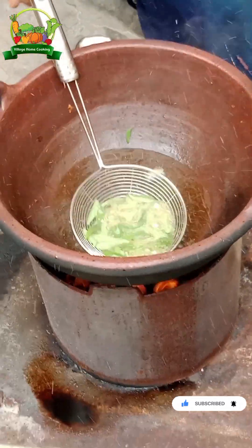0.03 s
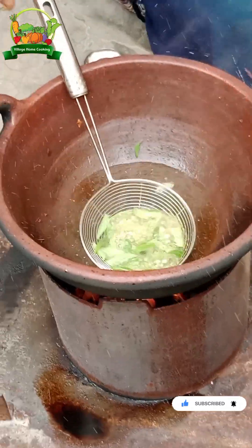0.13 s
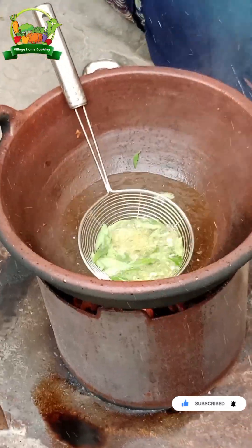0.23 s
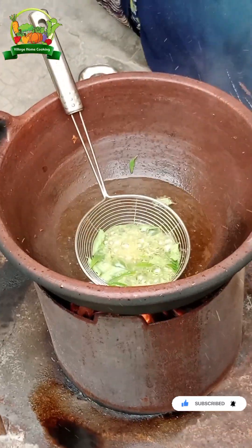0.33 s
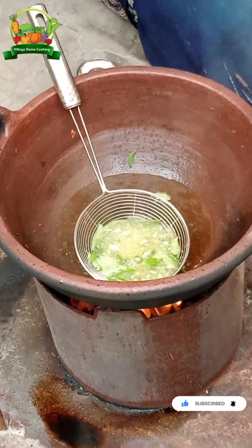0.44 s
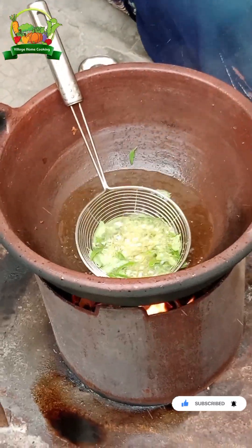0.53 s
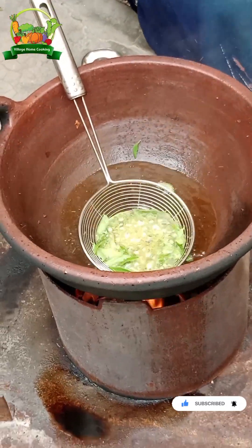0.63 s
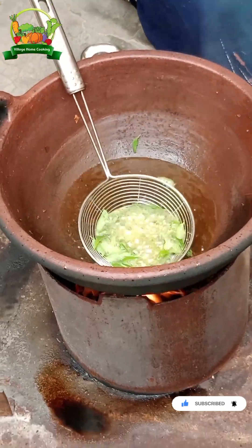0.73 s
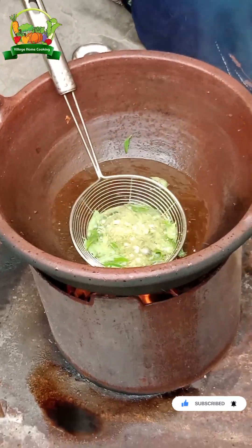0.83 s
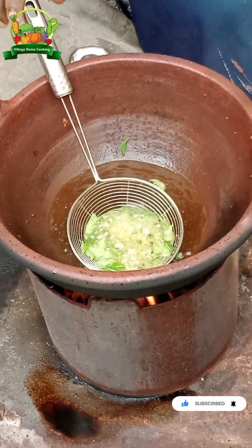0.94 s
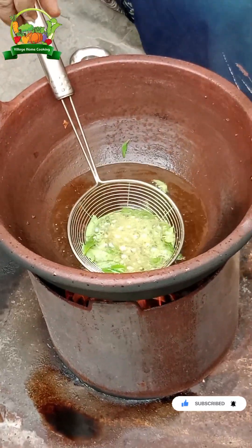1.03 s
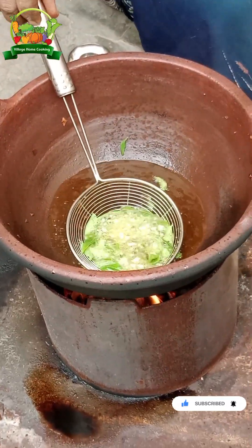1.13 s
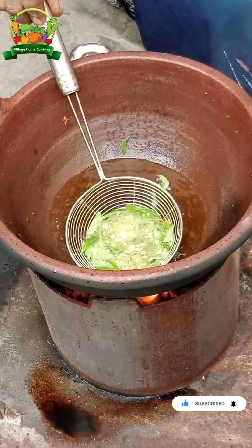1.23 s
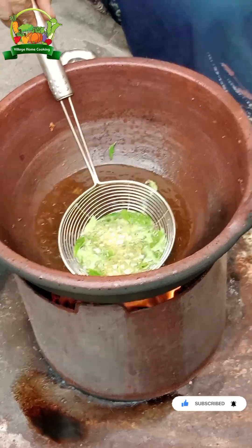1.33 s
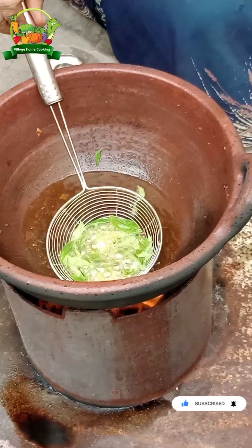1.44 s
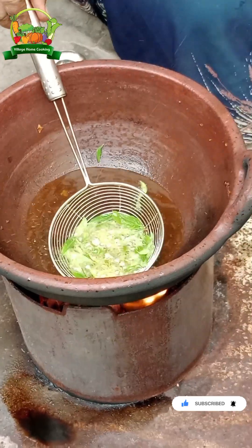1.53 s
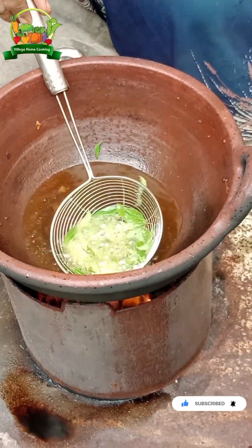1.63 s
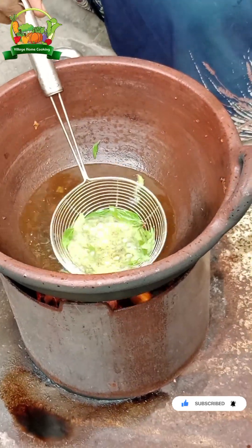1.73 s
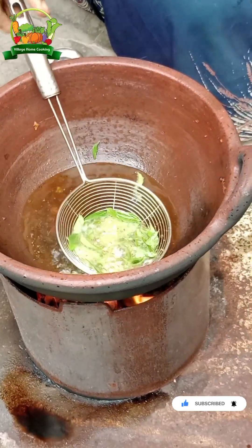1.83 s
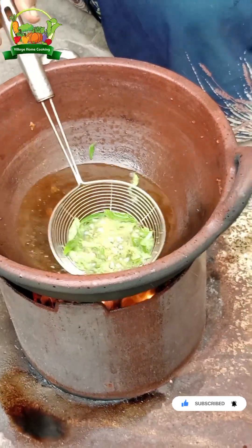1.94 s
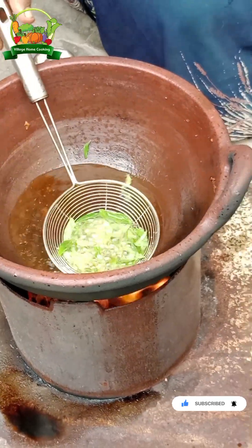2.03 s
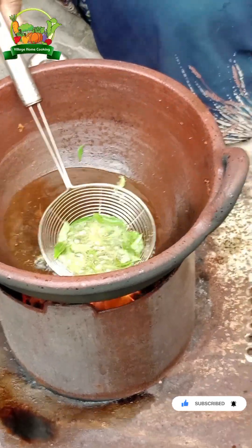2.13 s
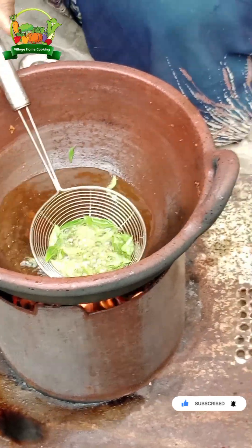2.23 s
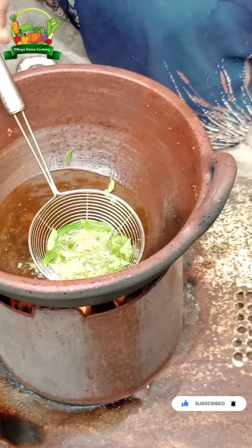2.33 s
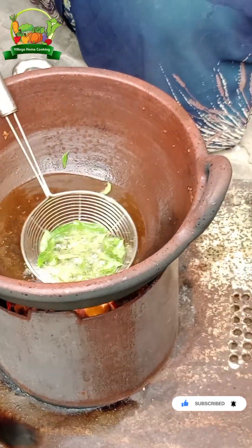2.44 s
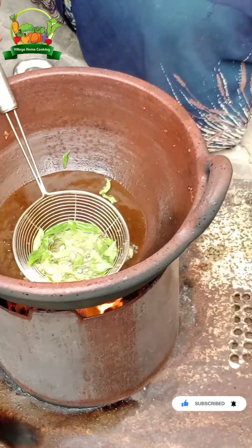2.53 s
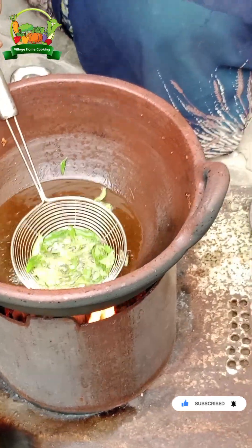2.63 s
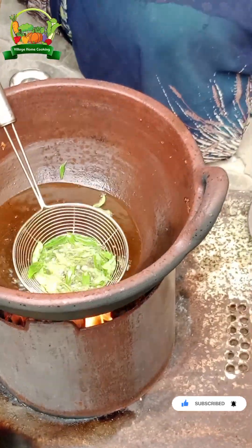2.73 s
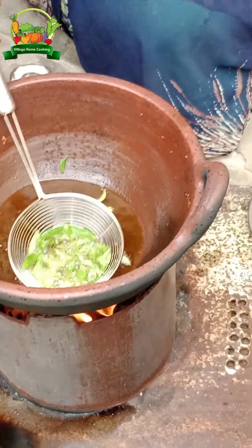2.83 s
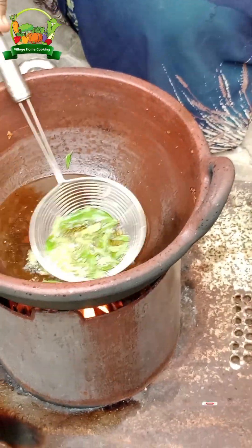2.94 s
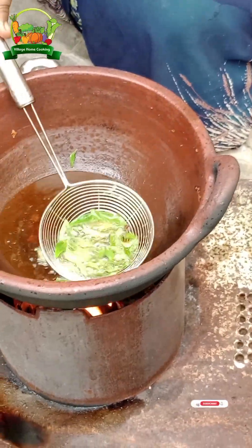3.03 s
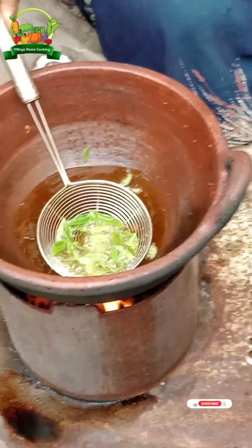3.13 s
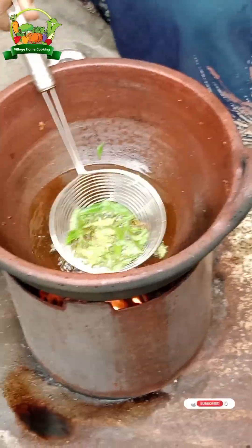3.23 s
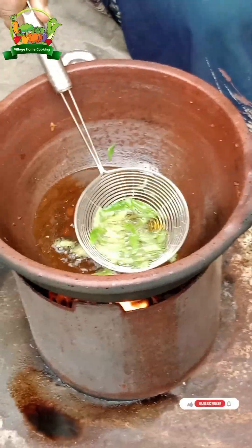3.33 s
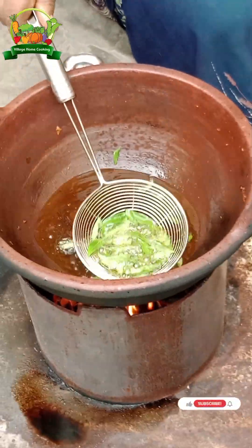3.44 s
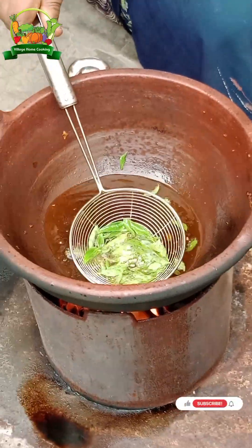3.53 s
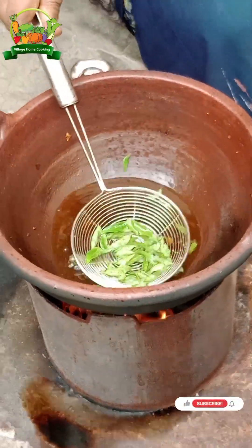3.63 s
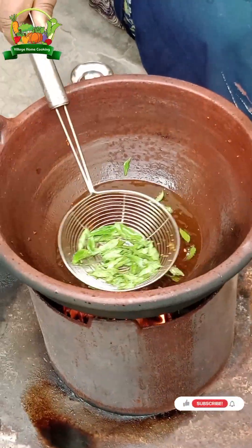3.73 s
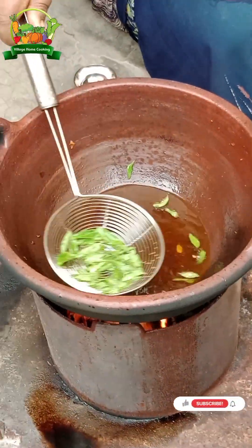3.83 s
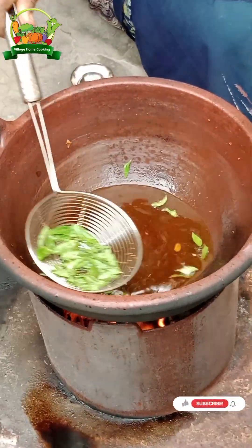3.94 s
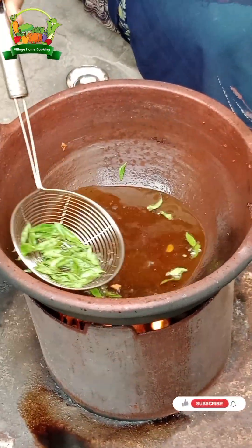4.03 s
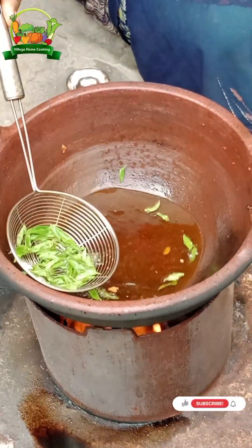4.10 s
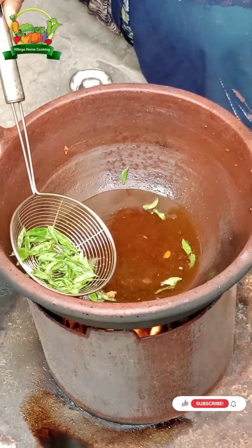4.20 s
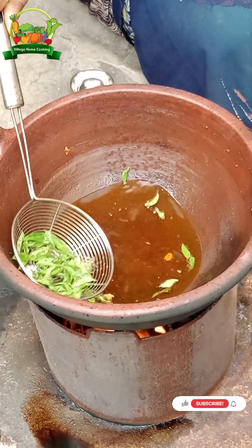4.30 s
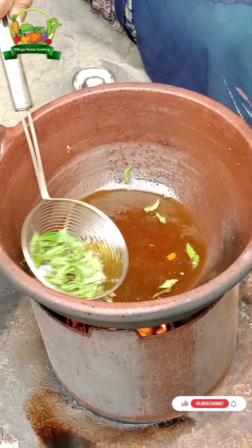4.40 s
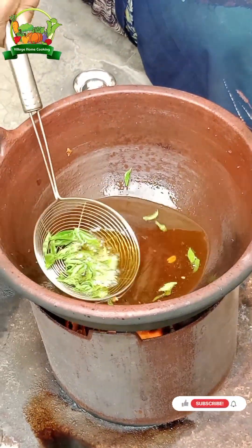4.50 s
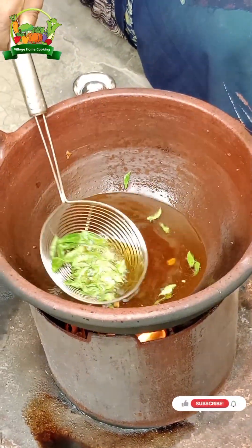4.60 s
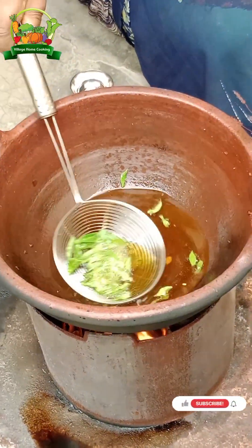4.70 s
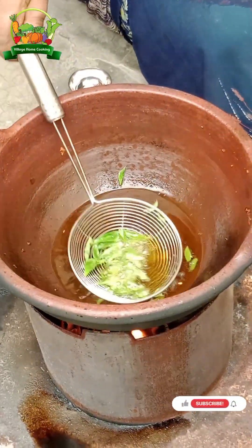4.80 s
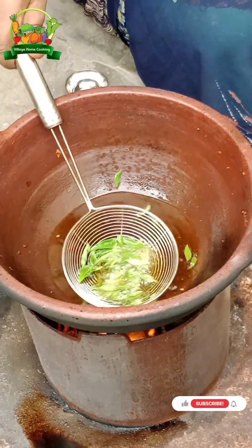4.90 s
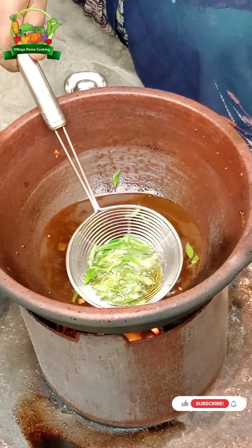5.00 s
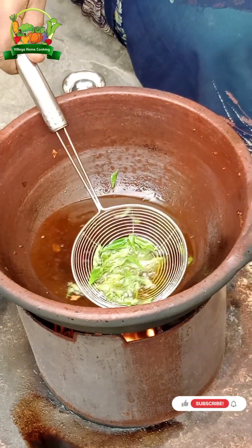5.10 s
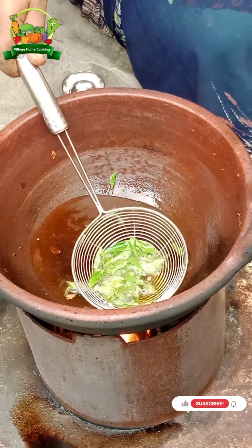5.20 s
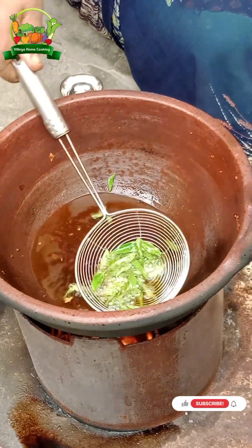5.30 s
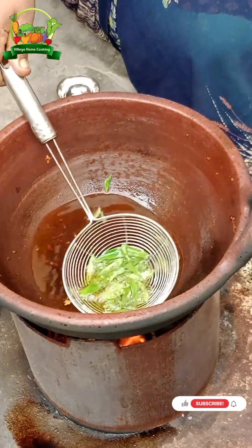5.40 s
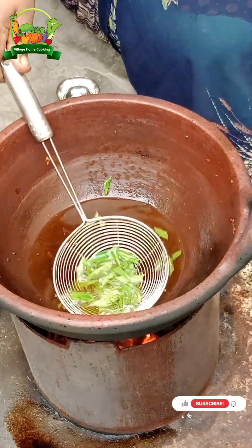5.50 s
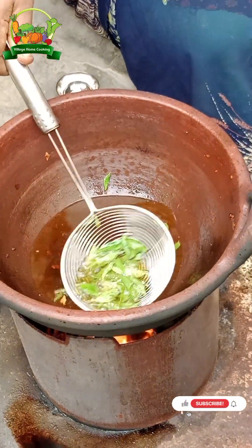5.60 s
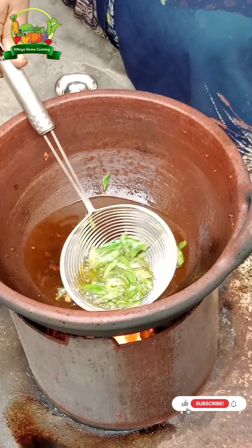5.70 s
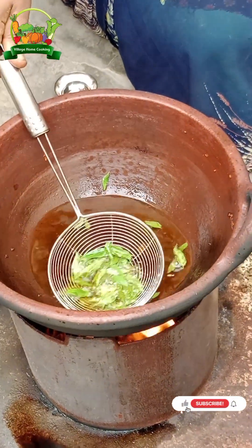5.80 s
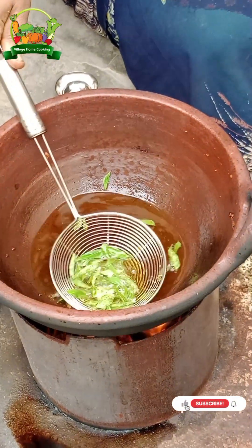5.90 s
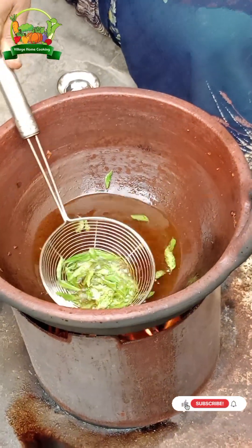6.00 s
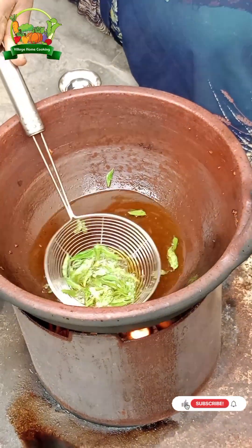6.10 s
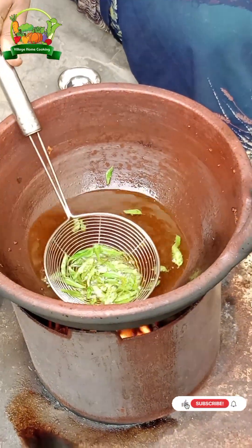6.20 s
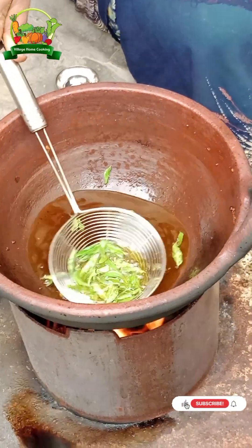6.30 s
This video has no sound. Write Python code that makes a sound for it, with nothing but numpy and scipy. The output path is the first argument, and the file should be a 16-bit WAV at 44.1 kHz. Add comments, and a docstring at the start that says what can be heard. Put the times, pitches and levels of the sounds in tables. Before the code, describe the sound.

Wet leaves fry in a wire skimmer in a clay pot of hot oil, crackling densely with sharp pops. After about two seconds the crackle thins to lone pops, a soft fizz and small bubbles. The skimmer rubs the clay with short squeaks and light scrapes, then knocks the pot once near the end. Heard from just above the pot, outdoors, over a faint fire rumble.

```python
"""A dense crackle opens the scene: wet leaves fry in a wire skimmer in a clay pot of hot oil, outdoors.
Water flashes to steam and bursts out in sharp pops and ticks that echo round the resonant bowl.
As the leaves dry, the crackle thins to lone pops and to ringing bubbles that fizz, plink and gulp.
Friction makes the skimmer sing and scrape on the clay, and one knock rings the modes of the pot.
Underneath, a wood fire rumbles."""
import sys
import numpy as np
from scipy import signal
from scipy.fft import rfft, irfft
from scipy.io import wavfile

SR = 44100
rng = np.random.default_rng(int(sys.argv[2]) if len(sys.argv) > 2 else 0)


def materialize(psi):
    """Save the field psi as 16-bit PCM at rate SR to the path in sys.argv[1].

    A 1-D psi becomes a single channel; in a 2-D psi each row is a channel.
    """
    bounded = np.clip(np.atleast_2d(psi).T, -1, 1)
    quanta = np.round(bounded * 32767).astype(np.int16)
    wavfile.write(sys.argv[1], SR, quanta)


N = 280035
TIME = np.arange(N) / SR
RING = 16384  # samples given to one event and its echoes

# Spectrum of oil spray. Each row: frequency in Hz, relative level in dB.
SPRAY_SPECTRUM = [(500, -21.5), (1500, 5), (3400, 9.5), (4800, 4), (6600, 4), (7800, -9.5), (10000, -25),
                  (12000, -50.5), (15000, -45.5)]


def undb(db):
    """Amplitude ratio of a level in decibels."""
    return 10 ** (np.asarray(db) / 20)


def unit(x):
    """Normalisation to rms 1."""
    return x / np.sqrt(np.mean(x ** 2) + 1e-20)


def fade(t, t60):
    """Exponential decay, 60 dB down after t60 seconds."""
    return np.exp(-np.log(1000) * t / t60)


def add(out, s, sound):
    """Superposition: a sound joins the mix at s seconds."""
    i = max(int(s * SR), 0)
    out[i:i + len(sound)] += sound[:max(N - i, 0)]


def freqs(size):
    """Frequencies of a real Fourier transform, kept above zero."""
    return np.maximum(np.arange(size // 2 + 1) * SR / size, 1)


def shape(points, size):
    """Spectral envelope in dB, interpolated over log frequency."""
    hz, db = np.transpose(points)
    return np.interp(np.log(freqs(size)), np.log(hz), db)


def band(size, hz, width_hz):
    """Response of a damped resonator, gain 1 at its centre."""
    f = freqs(size)
    return 1 / (1 + 1j * (f - hz ** 2 / f) / width_hz)


def filtered(x, response):
    """Linear filtering: the spectrum times a frequency response."""
    return irfft(rfft(x) * response, len(x))


def noise(size, response):
    """Gaussian noise coloured by a frequency response, at rms 1."""
    return unit(filtered(rng.standard_normal(size), response))


def through(source, response):
    """Convolution with an impulse response, cut to RING samples."""
    return signal.fftconvolve(source, response)[:RING]


def pulse(db):
    """Minimum phase: the most sudden pulse that has this spectrum."""
    cepstrum = irfft(np.log(undb(db)))
    cepstrum[1:RING // 2] *= 2
    cepstrum[RING // 2 + 1:] = 0
    return irfft(np.exp(rfft(cepstrum)))


def clicks(per_s, spread_db):
    """A Poisson train of uneven impulses, whose mean power stays even as the rate moves."""
    size = undb(spread_db * np.minimum(rng.standard_normal(N), 2))
    return (rng.random(N) < per_s / SR) * size / np.sqrt(per_s)


def bowl(early_db=-8, late_db=-7.5, early_t60=0.073, late_t60=0.16):
    """Impulse response from one spot in the oil: a dulled direct sound, reflection, then cavity resonance."""
    # Short echoes from the pot, then fainter ones from the ground or a nearby wall.
    # Each row: mean delay in milliseconds, mean gain.
    echoes = [(1.5, -0.036), (6.9, 0.23), (9.7, -0.16), (16.5, 0.055), (30, -0.011), (33.3, 0.021)]
    # Air resonances of the bowl. Each row: frequency in Hz, bandwidth in Hz, relative level in dB.
    air_modes = [(485, 94, 11.5), (677.5, 130, 11), (860, 62, 9.5), (1307, 42, 2), (1286.6, 38, 16.5),
                 (1401, 27, 8.5), (1776, 440, 8.5), (1976, 9.6, -6), (2680, 32, 0), (2945, 550, -17),
                 (3060, 20, -6.5), (3350, 22, -6.5)]
    t, f = np.arange(RING) / SR, freqs(RING)
    shadow_gain, shadow_hz = undb(-7), 2600  # the direct sound arrives with its treble dulled
    bent = np.exp(-2 * np.pi * shadow_hz * t)
    path = (1 - shadow_gain) * bent / bent.sum()
    path[0] += shadow_gain
    for ms, gain in echoes:
        delay_s = ms / 1000 * (1 + 0.027 * rng.uniform(-1, 1))
        path[int(delay_s * SR)] += gain * (1 + 0.055 * rng.standard_normal())
    focus_s, focus_width_s = 0.0078, 0.00029  # the curved wall focuses treble into one echo
    glint = unit(rng.standard_normal(RING) * np.exp(-((t - focus_s) / focus_width_s) ** 2))
    path += undb(-7) * filtered(glint, 1 / (1 + (5000 / f) ** 4)) / np.sqrt(RING)
    tail, build_s = 0, 0.0012
    for db, t60 in ((early_db, early_t60), (late_db, late_t60)):
        scatter = rng.standard_normal(RING) * fade(t, t60) * (1 - np.exp(-t / build_s))
        tail += undb(db) * unit(scatter) / np.sqrt(RING)
    cavity = 0.31 + sum(undb(db) * band(RING, hz, width) for hz, width, db in air_modes) / 2
    treble_lift = undb(4 * f ** 2 / (f ** 2 + 3000 ** 2))
    return path + filtered(tail, cavity * treble_lift)


def surges(rows, attack_s, release_t60, sag_db_per_s):
    """Incoherent sources add in power: the envelope of surges that each swell, sag and die away."""
    power = 0
    for s, length, db in rows:
        t = np.maximum(TIME - s, 0)
        held = undb(db - sag_db_per_s * np.minimum(t, length)) * (1 - np.exp(-t / attack_s))
        power += (held * fade(np.maximum(t - length, 0), release_t60)) ** 2
    return np.sqrt(power)


def boiling():
    """Amplitude envelope of flash boiling: each bout starts suddenly and ends quickly."""
    # Bouts of boiling. Each row: start in seconds, length in seconds, relative level in dB.
    bouts = [(0.0, 0.11, -29.5), (0.14, 0.056, -36), (0.187, 0.21, -33), (0.43, 0.23, -34.5),
             (0.682, 0.078, -42.5), (0.885, 0.096, -52), (1.02, 0.086, -44), (1.137, 0.018, -45),
             (1.295, 0.037, -49.5), (1.46, 0.2, -40.5), (1.73, 0.22, -41), (2.0, 0.057, -55)]
    return surges(bouts, attack_s=0.00048, release_t60=0.078, sag_db_per_s=21.5)


def burst(hz):
    """A steam bubble tears open as a heavily damped oscillator: about one cycle, more if small."""
    # Colour that the pot gives every burst. Each row: frequency in Hz, relative level in dB.
    colour = [(100, -22.5), (290, -10.5), (400, -15), (520, 10.5), (800, 7), (1050, 3), (1550, 1.5),
              (2100, -3), (3600, 3), (4600, -2), (6500, -4), (7800, -17), (10000, -19.5), (13000, -36)]
    resonance = np.abs(band(RING, hz, hz / (hz / 1000) ** 0.34))
    low_cut = np.sqrt(1 + (0.3 * hz / freqs(RING)) ** 4)
    crack = pulse(shape(colour, RING) + 20 * np.log10(resonance / low_cut + 0.0006))
    return crack / np.sqrt(np.mean(crack[:RING // 128] ** 2))  # rms 1 over the first 3 ms


def spray(swell_s=0.00077, grain_db=5, ripple_db=4, ripple_hz=1200):
    """Atomisation: droplets tear off a burst as grainy noise, each spray with its own colour."""
    t = np.arange(RING) / SR
    drops = rng.standard_normal(RING) * undb(grain_db * np.repeat(rng.standard_normal(RING // 32), 32))
    ripple = np.interp(freqs(RING), np.arange(32) * ripple_hz, rng.standard_normal(32))
    colour = shape(SPRAY_SPECTRUM, RING) + ripple_db * ripple
    hiss = through(drops * np.sqrt(t) * np.exp(-t / swell_s), pulse(colour))
    return hiss / np.sqrt(np.mean(hiss[:RING // 32] ** 2))


def crackle(gain_db=-2, wet_per_s=950, dry_per_s=170, drying_s=0.18, centre_hz=1150, sizes=10):
    """Shot noise from crowds of small steam bursts, whose rate falls as water leaves the leaves."""
    out, strength = 0, boiling()
    per_s = dry_per_s + (wet_per_s - dry_per_s) * np.exp(-TIME / drying_s)
    for octaves in np.linspace(-0.92, 0.92, sizes):
        source = burst(centre_hz * 2 ** octaves) + undb(-30) * spray()
        heard = through(source, bowl())
        onsets = unit(clicks(per_s / sizes, spread_db=4.5)) * strength
        out += signal.fftconvolve(onsets, heard / np.linalg.norm(heard))[:N]
    return out * undb(gain_db) / np.sqrt(sizes)


def foaming():
    """Amplitude envelope of the foam, which wells up gently round the leaves and ebbs away."""
    # Surges of foam. Each row: start in seconds, length in seconds, relative level in dB.
    wellings = [(0.0, .77, -63), (.87, 0.57, -68), (1.29, 0.6, -58.5), (1.73, 0.23, -60.5),
                (2.0, 0.059, -58.5), (2.15, 0.14, -58), (2.64, 0.15, -64), (2.87, 0.11, -69),
                (3.05, 0.24, -73.5), (3.24, 0.38, -64), (3.7, 0.042, -68.5), (4.695, 0.073, -65),
                (5.305, 0.053, -73.5), (5.42, 0.04, -77)]
    return surges(wellings, attack_s=0.02, release_t60=0.5, sag_db_per_s=2)


def spatter(boil_db=-19, foam_db=-8, per_s=110, spots=6):
    """Shot noise from tiny droplets that crack on the hot oil whenever it boils or foams."""
    out, strength = 0, boiling() * undb(boil_db) + foaming() * undb(foam_db)
    tick = pulse(shape(SPRAY_SPECTRUM, RING))
    for _ in range(spots):
        heard = through(tick, bowl(early_db=-8.5, late_db=-23.5))
        onsets = unit(clicks(per_s / spots, spread_db=5)) * strength
        out += signal.oaconvolve(onsets, heard / np.linalg.norm(heard))[:N]
    return out / np.sqrt(spots)


def bubble(hz, life_s, glide):
    """Bubble resonance: trapped gas rings as a spring, its pitch rising as it nears the surface."""
    age = np.arange(RING // 8) / SR / life_s
    pitch_hz = hz * (1 + glide * np.tanh(age - 0.5))
    return age ** 2 * np.exp(-4 * age) * np.sin(2 * np.pi * np.cumsum(pitch_hz) / SR)


def fizz(gain_db=-0.5, fresh_per_s=260, old_per_s=18, thinning_s=1.3, sizes=18):
    """Foam bubbles resonate at pitches set by their size; the dense hiss thins as the foam ages."""
    # Colour of the foam. Each row: frequency in Hz, relative level in dB.
    colour = [(300, 2), (700, 13.5), (1300, 12), (2200, 6), (4000, 13), (6400, 7.5), (7800, -21),
              (11000, -30), (15000, -31.5)]
    out = 0
    per_s = old_per_s + (fresh_per_s - old_per_s) * np.exp(-TIME / thinning_s)  # in each size
    for hz in np.linspace(1200, 7200, sizes):
        chirp = through(bubble(hz, life_s=0.001, glide=0.16), bowl(early_db=-6.5, late_db=-0.5))
        out += signal.fftconvolve(clicks(per_s, spread_db=3), chirp)[:N]
    return unit(filtered(out, undb(shape(colour, N)))) * foaming() * undb(gain_db)


def fire(rise_from_s=1, rise_s=0.96, growth_db_per_s=0.45, dip_s=0.066):
    """Modulated noise: under fluttering flames a low rumble, faint, then louder, with brief dips."""
    # Spectra of rumble, flames and open air. Each row: frequency in Hz, relative level in dB.
    rumble_spectrum = [(20, -27), (38, -5), (52, 5.5), (80, 8.5), (110, 4), (170, -16), (300, -36.5),
                       (600, -75.5)]
    flame_spectrum = [(30, -41), (70, -23.5), (100, -0.5), (135, 6.5), (180, -8.5), (300, -9), (600, -13),
                      (1500, -29.5), (5000, -45.5), (8000, -70.5)]
    air_spectrum = [(100, 9), (500, 7.5), (1500, -1), (3000, -7), (6300, -9.5), (8000, -17.5),
                    (15000, -28.5)]
    # Brief dips in the rumble. Each row: centre in seconds, depth in dB.
    dips = [(2.08, 30), (2.291, 29), (2.82, 15), (3.72, 21), (3.941, 17), (4.708, 29), (5.42, 15.5)]
    spectra = rumble_spectrum, flame_spectrum, air_spectrum
    rumble, flame, air = (noise(N, undb(shape(points, N))) for points in spectra)
    flutter = noise(N, band(N, 5.16, 2.3) ** 2)
    waver = noise(N, band(N, 1.6, 7.3) ** 2)
    risen = np.clip((TIME - rise_from_s) / rise_s, 0, 1)
    dip_db = sum(db * np.exp(-((TIME - s) / dip_s) ** 2) for s, db in dips)
    rumble_db = -84 + 24 * risen + growth_db_per_s * (TIME - TIME.mean()) + 3.5 * waver - dip_db
    flame_db = -77 + 5 * risen - 3 * flutter
    return rumble * undb(rumble_db) + flame * undb(flame_db) + air * undb(-81)


def plops(t60=0.055, swell_s=0.0019, glide=0.062, glide_s=0.0098):
    """Large bubbles resonate low: each gulps through the skimmer, rising a little in pitch."""
    # Large bubbles. Each row: start in seconds, peak level in dB, nominal pitch in Hz.
    gulps = [(.012, -43, 399), (0.109, -53.5, 390), (0.256, -47, 419), (1.897, -34, 506),
             (1.905, -47.5, 374), (1.916, -33, 495), (1.935, -37, 524), (2.301, -44.5, 557),
             (2.318, -44.5, 580), (2.337, -52.5, 524), (2.425, -45.5, 390), (2.432, -38.5, 572),
             (2.457, -43, 523), (2.503, -41, 541), (2.543, -50.5, 507), (2.57, -47, 535), (2.605, -53, 515),
             (5.039, -49.5, 524), (5.054, -45.5, 533), (5.063, -46, 405), (5.08, -49.5, 432),
             (5.093, -45.5, 610), (5.099, -60, 456), (5.11, -52, 628), (5.134, -51, 524), (5.172, -53, 640),
             (5.177, -50, 508), (5.209, -54, 500), (5.464, -38, 601), (5.497, -48, 398),
             (6.328, -48.5, 555)]
    out, t = np.zeros(N), np.arange(RING // 4) / SR
    envelope = fade(t, t60) * (1 - np.exp(-t / swell_s)) ** 2
    bend = 1 + glide * np.tanh(t / glide_s - 0.5)
    for s, db, hz in gulps:
        gulp = envelope * np.sin(2 * np.pi * np.cumsum(hz * bend) / SR)
        heard = through(gulp, bowl(early_db=-10.5, late_db=-3.5))
        add(out, s, undb(db) * heard / np.abs(heard).max())
    return out


def froth(low_hz=1500, high_hz=6400, swell_s=0.011, life_s=0.0032, count=14):
    """A handful of tiny bubbles resonate at random times, building up and trailing away."""
    out = np.zeros(RING)
    starts = rng.gamma(2, swell_s, count)
    pitches = low_hz * (high_hz / low_hz) ** rng.random(count)
    for s, hz, db in zip(starts, pitches, 5 * rng.standard_normal(count)):
        tone = bubble(hz, life_s, glide=0.05)
        i = min(int(s * SR), RING // 2)
        out[i:i + len(tone)] += undb(db) * tone
    return out / np.sqrt(np.sum(out ** 2) / (RING // 16))  # the energy of 23 ms at rms 1


def pops(gain_db=-1.5, spurt_s=0.009, froth_lead_s=0.009):
    """Sudden pressure release: loud steam bursts, each with froth, spray and a second spurt."""
    # Loud bursts. Each row: start in seconds, relative level in dB, bubble pitch in Hz.
    bursts = [(.0362, -29, 1300), (.048, -36.5, 1150), (0.0569, -25, 1630), (0.0662, -29.5, 2100),
              (0.0832, -28, 1940), (.0977, -29.5, 1300), (.1083, -32, 1130), (.1153, -29.5, 1400),
              (.1346, -21.5, 1600), (.1827, -29.5, 1520), (0.2112, -34, 1490), (.2295, -28.5, 1090),
              (.2485, -35.5, 1600), (.268, -26.5, 1340), (.2862, -35, 1030), (.2995, -31, 1250),
              (0.3236, -24, 1200), (.3526, -32, 1420), (0.3594, -34, 1140), (0.4167, -37, 1310),
              (.4472, -27.5, 1120), (0.4553, -32, 1880), (.4936, -49, 1190), (.5197, -38, 1700),
              (0.5557, -29.5, 1380), (.632, -25.5, 1070), (.6533, -29, 1440), (0.6795, -28.5, 1310),
              (0.7191, -30.5, 1150), (.7419, -38, 1080), (.7503, -36, 1400), (0.7621, -33.5, 1650),
              (.7747, -35, 1050), (.852, -45.5, 1500), (0.8798, -33, 1270), (.894, -35.5, 1680),
              (.928, -33.5, 1180), (0.9411, -32.5, 1420), (1.0005, -44, 1800), (1.0085, -33, 1480),
              (1.0281, -29, 1250), (1.0421, -30, 1300), (1.075, -30, 990), (1.0934, -32.5, 1240),
              (1.1067, -35, 960), (1.133, -31, 1170), (1.1574, -35, 1230), (1.1735, -36, 1100),
              (1.21, -40, 1270), (1.273, -55, 2600), (1.2897, -35.5, 1480), (1.3077, -32, 1420),
              (1.3532, -26, 1000), (1.3713, -51, 1150), (1.4061, -34, 980), (1.4331, -28, 980),
              (1.4498, -39, 1090), (1.4661, -26.5, 1280), (1.4852, -30.5, 1110), (1.5118, -25, 1220),
              (1.5189, -31.5, 1060), (1.5477, -28.5, 1050), (1.562, -30.5, 1380), (1.5776, -30.5, 1070),
              (1.595, -29, 1080), (1.6212, -34, 1490), (1.6359, -34, 1520), (1.723, -39, 900),
              (1.729, -32, 1180), (1.7511, -26.5, 1190), (1.7794, -37, 1550), (1.8014, -38, 970),
              (1.8188, -28, 1130), (1.8573, -39.5, 1150), (1.8914, -45, 1400), (1.9099, -28, 1200),
              (2.004, -46, 1670), (2.045, -33.5, 1410), (2.1756, -52, 2500), (2.2156, -36, 1300),
              (2.2612, -24, 1080), (2.5049, -29.5, 1450), (2.7189, -48, 2040), (2.773, -45, 1730),
              (2.9551, -48, 2200), (3.2286, -43.5, 1480), (3.2788, -40.5, 1930), (3.383, -37.5, 1260),
              (3.43, -27.5, 1170), (3.5105, -45.5, 2400), (3.5402, -48, 1860), (3.5692, -46, 2480),
              (3.6378, -50, 1900), (3.722, -54, 3360), (3.815, -47, 2730), (3.9059, -57.5, 3290),
              (4.6969, -48, 2680), (4.7617, -46.5, 1890), (4.7787, -33.5, 1080), (4.7859, -46.5, 3200),
              (4.8603, -44.5, 2080), (4.877, -48, 1260), (4.9035, -45.5, 1170), (5.311, -59.5, 1890),
              (5.434, -44.5, 2360), (5.4639, -42, 1120), (5.587, -43, 1030), (5.8461, -44.5, 1105)]
    out = np.zeros(N)
    loudest_db = max(db for _, db, _ in bursts)
    for s, db, hz in bursts:
        # small, late and weak bursts carry more spray, and late spray is slower
        spray_db = -25 + 3 * np.log2(hz / 1000) + 2.5 * s + 0.07 * (loudest_db - db)
        source = burst(hz) + undb(spray_db) * spray(swell_s=0.00042 * (1 + 0.9 * s))
        lag = int(spurt_s * rng.uniform(0.44, 2.7) * SR)
        source[lag:] += undb(spray_db - 4) * spray()[:RING - lag]
        path = bowl()
        add(out, s, undb(db + gain_db) * through(source, path))
        add(out, s - froth_lead_s, undb(db - 25 + 0.8 * s) * through(froth(), path))
    return out


def droplet_ticks(gain_db=0.5, tick_s=0.00039):
    """A short pulse has a wide spectrum: flying droplets burst as bright ticks that echo briefly."""
    # Droplets. Each row: start in seconds, relative level in dB, added tilt above 10 kHz in dB/octave.
    droplets = [(0.033, -53, -13.5), (0.0495, -54.5, -24.5), (0.0645, -57, -17), (0.0884, -54, -34),
                (0.134, -60, -23), (0.184, -58.5, -14), (0.283, -54, -5), (0.294, -67.5, -8),
                (0.3516, -70, -28), (0.38, -57, -27), (0.4536, -59.5, -21), (0.5247, -69, -20),
                (0.654, -64, -6.5), (0.747, -64, -33), (0.887, -56.5, -37), (1.042, -56, -24),
                (1.0757, -57, -34), (1.1129, -66, -30), (1.3564, -81.5, -10), (1.409, -67, -7),
                (1.4655, -56.5, -16), (1.4865, -52.5, -12.5), (1.5125, -57.5, -4), (1.5534, -59, -13.5),
                (1.595, -49, -31), (1.621, -55, -24), (1.73, -55.5, -33), (1.8176, -48.5, -36),
                (1.857, -55, -13), (1.913, -49.5, -36), (2.215, -58.5, -11), (2.2613, -51, -8),
                (2.5037, -49, -31), (3.279, -58, -17), (3.4298, -52.5, -1), (3.541, -66, -2),
                (3.816, -61.5, -7), (4.7, -62, -21), (4.786, -58, -36), (5.588, -61, -30),
                (5.847, -77, -20)]
    # Spectrum of a tick. Each row: frequency in Hz, relative level in dB.
    colour = [(2000, -25), (6000, 8.5), (8000, -2.5), (10000, -10), (12500, -16), (15500, -11.5)]
    out, t = np.zeros(N), np.arange(RING) / SR
    octaves = np.log2(np.maximum(freqs(RING) / 10000, 1))
    for s, db, tilt in droplets:
        snap = rng.standard_normal(RING) * t * np.exp(-t / tick_s)
        tick = through(snap, pulse(shape(colour, RING) + tilt * octaves))
        heard = through(tick, bowl(early_db=-3, late_db=-6, early_t60=0.078, late_t60=0.11))
        add(out, s, undb(db + gain_db) * heard / np.sqrt(np.mean(heard[:RING // 32] ** 2)))
    return out


def plinks(gain_db=2, puff_width_hz=1300, puff_s=0.0068):
    """Lone small bubbles resonate as they surface, in a puff of froth and a faint splash."""
    # Small bubbles. Each row: start in seconds, relative level in dB, nominal pitch in Hz.
    lone_bubbles = [(0.862, -49, 4600), (1.233, -54, 4520), (1.335, -56, 4280), (2.101, -51.5, 5900),
                    (2.177, -55.5, 3320), (2.445, -55, 5820), (2.648, -64, 5950), (2.687, -46.5, 4050),
                    (2.8698, -57.5, 3990), (2.893, -56, 3380), (3.007, -49, 2670), (3.109, -60.5, 5010),
                    (3.15, -63, 5500), (3.2588, -52, 5180), (3.278, -48, 2100), (3.337, -57.5, 5770),
                    (3.42, -58, 4800), (3.514, -58, 6060), (3.643, -57.5, 6240), (3.712, -55.5, 5170),
                    (3.748, -47.5, 3980), (3.888, -57, 5300), (3.907, -55.5, 3460), (3.956, -58.5, 5740),
                    (4.047, -49, 5020), (4.113, -55, 5960), (4.426, -56, 2590), (4.628, -58, 2010),
                    (4.668, -62.5, 2800), (4.7623, -42.5, 2410), (4.859, -50, 2660), (4.954, -68, 3750),
                    (5.1013, -57.5, 2580), (5.135, -47.5, 2540), (5.353, -71, 6000), (5.5067, -49, 2390),
                    (5.518, -53.5, 4190), (5.853, -50, 4120)]
    out, t = np.zeros(N), np.arange(RING) / SR
    for s, db, hz in lone_bubbles:
        hiss = rng.standard_normal(RING) * t * np.exp(-t / puff_s)
        puff = filtered(hiss, band(RING, hz, puff_width_hz) ** 3)
        splash = spray() + froth(low_hz=2110, swell_s=0.0045, life_s=0.0016)
        source = undb(-25) * splash + undb(-1) * puff / np.abs(puff).max()
        tone = bubble(hz, life_s=0.005, glide=0.09)
        source[:len(tone)] += tone / np.abs(tone).max()
        heard = through(source, bowl(early_db=-4, late_db=-6))
        add(out, s, undb(db + gain_db) * heard / np.abs(heard).max())
    return out


def rubs(roughness=0.75, pitch_waver=0.015, waver_db=2):
    """Stick-slip friction: the wire sings on the clay, wavering with the pressure of the hand."""
    # Strokes of the wire. Each row: start and length in seconds, first and last pitch in Hz,
    # bandwidth in Hz, relative level in dB.
    strokes = [(2.604, 0.27, 950, 1002, 30, -57.5), (2.986, 0.13, 656, 640, 5.1, -44),
               (3.083, 0.097, 638, 685, 20, -60), (3.196, 0.27, 630, 645, 26, -54.5),
               (3.358, 0.078, 622, 663, 11, -44), (3.478, 0.26, 850, 1000, 39, -59.5),
               (4.273, 0.084, 710, 698, 39, -73.5), (4.502, 0.11, 613, 685, 59, -58.5),
               (4.802, 0.32, 986, 954, 6.6, -62), (4.812, 0.2, 649, 635, 11, -57.5),
               (5.461, 0.1, 644, 645, 11, -47), (5.533, 0.14, 638, 641, 2.7, -52.5),
               (5.588, 0.17, 748, 780, 4.8, -59.5), (5.746, 0.17, 724, 672, 22, -53.5),
               (6.025, 0.15, 1224, 1168, 32, -67.5), (6.171, 0.13, 1160, 1128, 51, -69)]
    # Resonances rung by the rasp. Each row: frequency in Hz, bandwidth in Hz, relative level in dB.
    rasp_modes = [(1226, 70, 6.5), (1620, 33, -4.5), (1893, 77, 5.5), (2290, 110, 1.5), (2590, 58, -5),
                  (3330, 570, -18)]
    out = np.zeros(N)
    resonances = sum(undb(db) * band(RING, hz, width) ** 2 for hz, width, db in rasp_modes)
    for s, length, start_hz, end_hz, width_hz, db in strokes:
        n = min(int(length * SR), RING)
        progress = np.linspace(0, 1, n)
        lowpass = 1 / (1 + (freqs(RING) / width_hz) ** 2)
        grip = 1 + roughness * (noise(RING, lowpass) + 1j * noise(RING, lowpass))[:n]
        pressure = noise(RING, band(RING, 12.7, 19) ** 2)[:n]
        pitch_hz = (start_hz + (end_hz - start_hz) * np.sqrt(progress)) * (1 + pitch_waver * pressure)
        phase = 2 * np.pi * np.cumsum(pitch_hz) / SR
        note = unit(np.real(grip * np.exp(1j * phase)))
        overtones = unit(np.real(grip * (np.exp(2j * phase) + 0.5 * np.exp(3j * phase))))
        grit = unit(filtered(rng.standard_normal(RING) ** 3, resonances))[:n]
        # the less steady the note, the more it rasps
        rasp = np.sqrt(width_hz / 50) * (undb(-22) * overtones + undb(-8) * grit)
        envelope = undb(db + waver_db * pressure) * np.sin(np.pi * progress ** 0.57)
        add(out, s, envelope * (note + rasp))
    return out


def scrapes(catches_per_s=170, spread_db=6, dying_db=11):
    """Impulsive excitation: the skimmer touches the clay and drags, each catch ringing its wire."""
    # Drags of the skimmer. Each row: start in seconds, length in seconds, rms level in dB.
    drags = [(3.816, 0.018, -68), (4.764, 0.022, -57), (4.864, 0.12, -64.5), (5.308, 0.052, -67.5),
             (5.443, 0.082, -59.5), (5.59, 0.046, -59), (5.849, 0.024, -59)]
    # Modes of the wire. Each row: frequency in Hz, relative level in dB, 60 dB decay time in seconds.
    wire_modes = [(1336, 5, 0.16), (1835, -7, 0.076), (1983, 10.5, 0.047), (2730, -4, 0.1),
                  (2890, -15.5, .14), (3420, -5, 0.098), (4230, -16.5, 0.11)]
    out, t = np.zeros(N), np.arange(RING) / SR
    ring = sum(undb(db) * fade(t, t60) * np.sin(2 * np.pi * hz * t) for hz, db, t60 in wire_modes)
    touch = unit(ring) + undb(-9) * unit(pulse(shape(SPRAY_SPECTRUM, RING)))
    for s, length, db in drags:
        caught = (rng.random(RING) < catches_per_s / SR) * (t < length)
        catches = caught * undb(spread_db * rng.uniform(-0.92, 1, RING) - dying_db * t / length)
        catches[0] = undb(6)  # the first contact is the hardest
        heard = through(catches, touch)
        add(out, s, undb(db) * heard / np.sqrt(np.mean(heard[t < length] ** 2)))
    return out


def knock(contact_s=0.0041, sag=0.17, sag_s=0.012, rattle=0.35):
    """Modal ringing: a soft blow sounds the pot, which rattles and sags in pitch as the wire lets go."""
    # The skimmer's blow. Each row: start in seconds, relative level in dB.
    blows = [(5.777, -20.5)]
    # Modes of the pot. Each row: frequency in Hz, relative level in dB, 60 dB decay time in seconds.
    pot_modes = [(190, -1, 0.084), (653, -6.5, 0.04), (860, -20, 0.087), (1070, -23, 0.21)]
    out, t = np.zeros(N), np.arange(RING) / SR
    clock = t + sag * sag_s * (1 - np.exp(-t / sag_s))  # runs fast at first, so the modes start sharp
    ring = 0
    for hz, db, t60 in pot_modes:
        chatter = 1 + rattle * hz / 500 * noise(RING, band(RING, 76, 120) ** 3)
        ring += undb(db) * fade(t, t60) * np.sin(2 * np.pi * hz * clock) * chatter
    for s, db in blows:
        add(out, s, -undb(db) * ring * (1 - np.exp(-(t / contact_s) ** 2)))
    return out


def scene():
    """Superposition of oil, skimmer and fire, heard in mono from just above the pot."""
    oil = pops() + droplet_ticks() + crackle() + spatter() + fizz() + plinks() + plops()
    return (oil + rubs() + scrapes() + knock() + fire())[None]


def record(dry):
    """Band limiting: a steep low-pass filter removes the treble above 15.8 kHz."""
    return signal.sosfilt(signal.ellip(8, 0.2, 70, 15800, fs=SR, output="sos"), dry)


dry = scene()
out = record(dry)
materialize(out)
```